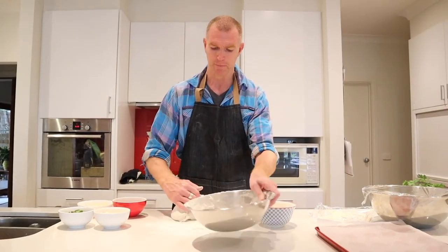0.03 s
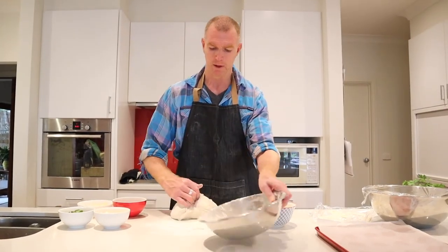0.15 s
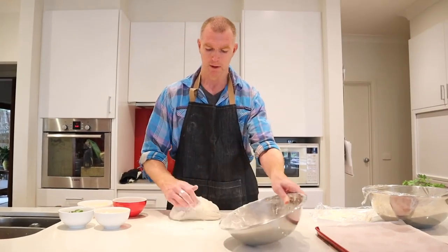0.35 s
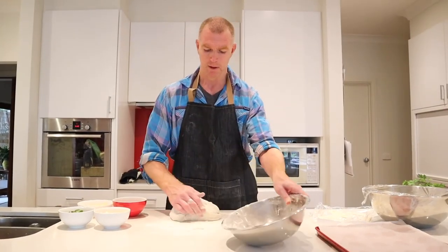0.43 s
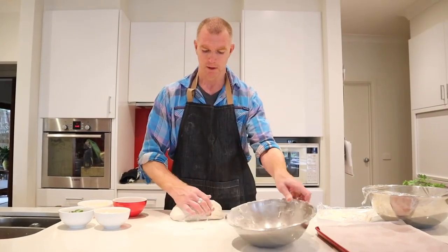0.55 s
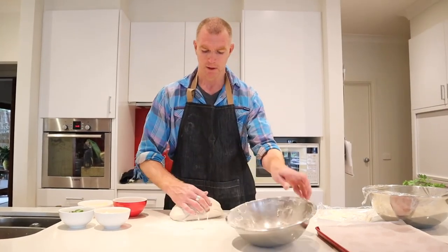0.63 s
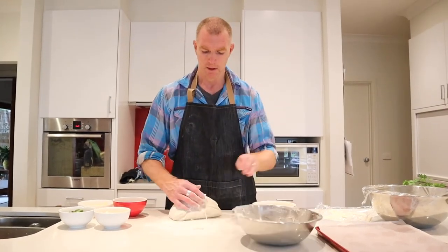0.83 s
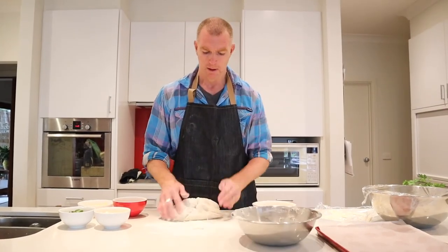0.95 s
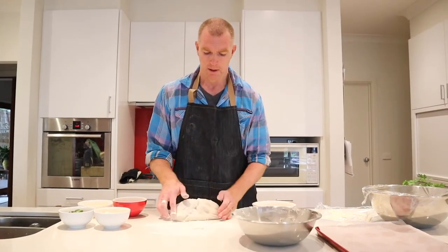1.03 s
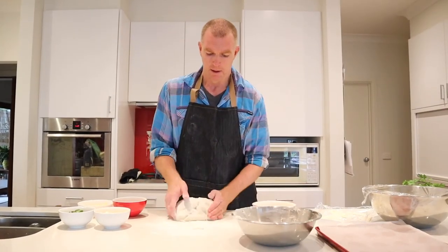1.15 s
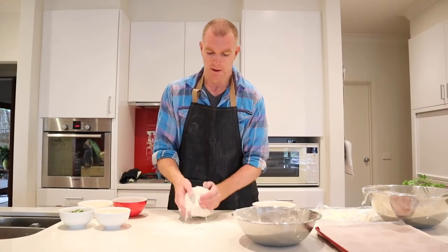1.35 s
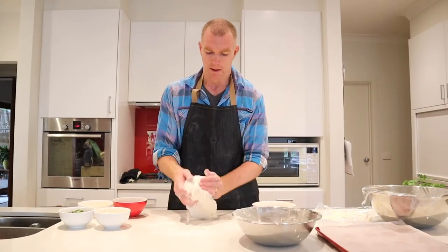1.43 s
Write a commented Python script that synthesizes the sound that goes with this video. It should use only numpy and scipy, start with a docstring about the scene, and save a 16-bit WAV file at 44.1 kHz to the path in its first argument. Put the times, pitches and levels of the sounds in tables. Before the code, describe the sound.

A steel mixing bowl knocks in quickening bursts on a hard kitchen benchtop and rocks flat

```python
"""A steel mixing bowl is set down on its edge on a hard benchtop, knocks ever quicker, then is let go and rocks flat.
Each knock rings the bowl's modes, thuds in the bench and clinks at the rim; the rolling rim rattles.
Faint ticks and a rustle of hands on dough are filtered clicks and noise; a hard-walled kitchen reverberates.
A fridge hums in wavering sines over shaped room noise; a limiter holds the knocks down.
"""
import sys
import numpy as np
from scipy import signal
from scipy.fft import rfft, irfft
from scipy.io import wavfile
from scipy.ndimage import uniform_filter1d

SR = 44100
rng = np.random.default_rng(int(sys.argv[2]) if len(sys.argv) > 2 else 0)


def to_wav(sig):
    """Store sig (one row per channel, or 1-D mono) as 16-bit WAV at the path in sys.argv[1].

    Samples outside -1..1 are clipped; the rate is SR.
    """
    pcm = np.clip(np.atleast_2d(sig), -1, 1) * 32767
    pcm = np.round(pcm).astype(np.int16)
    wavfile.write(sys.argv[1], SR, pcm.T)  # frames by channels


N = 66150

# Kitchen reverberation. Each row: frequency in Hz, t60 in s, level in dB, left-right likeness (1 = identical).
ROOM_BANDS = [(100, 0.2, -25.5, 0.95), (251, 0.52, -32.5, 0.96), (520, 0.54, -26.5, 0.19),
              (940, 0.54, -33.5, 0.49), (1880, 0.57, -32.5, 0.26), (4030, 0.48, -42, 0.14),
              (6800, 0.41, -38, 0.067), (9500, 0.09, -26, 0.34), (15300, 0.058, -37, .5)]

# bowl ring
RING_RISE_S, STRIKE_SPREAD_DB = 0.0014, 2
FAVOUR_DB, FAVOUR_OCTAVES = 7.5, 0.079  # the landing point on the rim favours modes near one pitch
GRIP_DB = 4.5  # ring lost to each later knock
DETUNE = .0008  # chance spread of mode pitch, as a fraction
RING_TO_ROOM_DB = -12
# bench and rim contacts
CONTACT_S, ROLL_PER_S, LOW_CUT_HZ = .0022, 4000, 83
TICK_T60_S = .003
# microphone ports: positive lag delays the left, positive pan lifts the left
TILTED_LAG_S, FREE_LAG_S = -0.000017, 2e-5
TILTED_PAN_DB, FREE_PAN_DB, PAN_FULL_HZ = 4, 1, 4130
# room and background
ROOM_ONSET_S = 0.00067
RUSTLE_LOW_HZ, RUSTLE_HIGH_HZ = 2000, 7440
HUM_WAVER_DB, FLOOR_DB = 2, -50.5
# limiter and output
LIMIT_DB, LIMIT_RATIO, RELEASE_DB_PER_S = -16.5, 2.135, 52.5
ATTACK_S, LOOK_AHEAD_S = 0.00057, 0.00099
TOP, CUTOFF_HZ = 0.42, 16300  # soft ceiling (full scale = 1), treble cutoff


def amp(db):
    """Decibels to amplitude."""
    return 10 ** (np.asarray(db) / 20)


def rms_one(x):
    """Scale to an rms of 1."""
    return x / np.sqrt(np.mean(x ** 2) + 1e-20)


def at_hz(rows, hz, order=1):
    """Read column `order` at hz, interpolated over log frequency."""
    rows = np.array(rows)
    return np.interp(np.log(hz), np.log(rows[:, 0]), rows[:, order])


def ring(clicks, hz, t60_s):
    """A two-pole resonance: a unit click sets a sine of height 1 ringing."""
    r = amp(-60 / (t60_s * SR))
    w = 2 * np.pi * hz / SR
    return signal.lfilter([0, np.sin(w)], [1, -2 * r * np.cos(w), r * r], clicks + 1e-18)


def thump(clicks, hz, t60_s):
    """A resonance applied twice: steep flanks, soft start, height near 1."""
    r = amp(-120 / (t60_s * SR))
    once = ring(clicks, hz, t60_s / 2)
    return 2 * np.e * (1 - r) * ring(once, hz, t60_s / 2)


def train(start_s, db):
    """One click per start time."""
    out = np.zeros(N)
    out[(np.asarray(start_s) * SR).astype(int)] = amp(db)
    return out


def low_cut(x):
    """A small bowl sends out no deep bass."""
    return signal.sosfilt(signal.butter(4, LOW_CUT_HZ, "high", fs=SR, output="sos"), x)


def bandpass(x, low_hz, high_hz):
    """Second-order Butterworth band."""
    return signal.sosfilt(signal.butter(2, [low_hz, high_hz], "band", fs=SR, output="sos"), x)


def drift(rate_hz):
    """Slow chance, rms 1: two-pole smoothed noise, drawn every 40 samples."""
    r = np.exp(-80 * np.pi * rate_hz / SR)
    white = rng.standard_normal(N // 40 + 2002)
    slow = signal.lfilter([1], [1, -2 * r, r * r], white)[2000:]
    return np.interp(np.arange(N) / 40, np.arange(len(slow)), rms_one(slow))


def bands():
    """Half-octave bands of stereo noise with the room's likeness: pairs (Hz, noise)."""
    edges_hz = 22 * 2 ** np.arange(0, 9.6, .5)
    white = rng.standard_normal((2, 2, N))
    for k, (low_hz, high_hz) in enumerate(zip(edges_hz, edges_hz[1:])):
        mid, side = bandpass(white[k % 2], low_hz, high_hz)
        hz = np.sqrt(low_hz * high_hz)
        alike = np.clip(at_hz(ROOM_BANDS, hz, order=3), -1, 1)
        yield hz, np.sqrt(1 + alike) * mid + np.sqrt(1 - alike) * side * [[1], [-1]]


def bowl_ring(knocks, free):
    """Every knock feeds all modes in step with their swing; later knocks take some of that ring away."""
    # One value per mode, in Hz.
    mode_hz = [262, 354, 499, 532, 741, 793, 994, 1313, 1472, 1614, 1911, 2379, 3176, 3580, 4620, 5335]
    # Each row, one mode: t60 in s, level in dB when tilted, level in dB when free.
    mode_rows = [(0.2, -16.5, -18), (0.028, -20, -17.5), (0.32, -34, -8.5), (0.21, -5, -7.5),
                 (0.2, -48, -4.5), (0.36, -26, -8), (0.14, -51, -6), (0.2, -10, -12), (0.29, -45, -12),
                 (0.31, -23.5, -9), (0.22, -28, -50), (0.12, -40, -14), (0.091, -32.5, -12.5),
                 (0.16, -37, -22.5), (0.084, -32, -38), (0.035, -26, -19)]
    hz = np.array(mode_hz)[:, None]
    t60_s, mode_db = np.array(mode_rows)[:, [0, 1 + free]].T[:, :, None]
    out = np.zeros(N + SR)
    t = np.arange(SR // 2) / SR
    starts_s = np.array(knocks)[:, 0]
    chance = rng.standard_normal((len(knocks), 2, len(mode_hz), 1))
    for (start_s, ring_db, tilt_db, favoured_hz, *_), (spread, shift) in zip(knocks, chance):
        favour = np.exp(-(np.log2(hz / favoured_hz) / FAVOUR_OCTAVES) ** 2)
        strike_db = mode_db + tilt_db * np.log2(hz / 700) + FAVOUR_DB * favour + STRIKE_SPREAD_DB * spread
        swing = np.sin(2 * np.pi * hz * (start_s + (1 + DETUNE * shift) * t))
        modes = amp(strike_db - 60 * t / t60_s) * swing
        later = np.searchsorted(starts_s[starts_s > start_s + .02], start_s + t) * 1.0
        later = uniform_filter1d(later, size=90)
        envelope = amp(ring_db - GRIP_DB * later) * (1 - np.exp(-t / RING_RISE_S))
        first = int(start_s * SR)
        out[first:first + len(t)] += envelope * modes.sum(0)
    return low_cut(out[:N])


def contacts(knocks, free):
    """Knocks thud in the bench and clink at the rim by brief rough contact; tiny contacts rattle as it rolls."""
    # Dull bench body. Each row: frequency in Hz, t60 in s, level in dB when tilted, level in dB when free.
    bench_modes = [(124.5, 0.044, -23, -27.5), (201.5, 0.025, 6, -9.5), (292, 0.033, 2.5, -12),
                   (458, 0.012, 6, -7), (648, 0.016, -9, -7), (807, 0.017, -0.5, -4.5),
                   (1164, 0.011, -21.5, -5.5), (1385, 0.034, -20.5, -10), (1593, 0.027, -28.5, -6)]
    # Bright rim resonances. Each row: frequency in Hz, t60 in s, level in dB when tilted, level in dB when free.
    rim_modes = [(1930, 0.0026, -6.5, 3), (2877, 0.013, -15.5, -4), (3820, 0.0015, -1.5, 4.5),
                 (4677, 0.0058, -0.5, -1.5), (5286, 0.013, -2, -6), (6120, 0.002, -1, 0),
                 (7820, 0.0032, -12.5, -5.5), (8790, 0.00089, -11.5, -5), (11600, 0.0019, -23.5, -11.5),
                 (13100, 0.0007, -32, -40)]
    # Rim rolling. Each row: start in s, end in s, level in dB, centre in Hz, half-width (to 1/e) in octaves.
    rolls = [(0.378, 0.544, -36.5, 4770, 0.8), (0.729, 0.845, -30.5, 5250, 0.41),
             (0.91, 1.028, -29.5, 4000, 1)]
    start_s, _, _, _, thud_db, thud_tilt_db, clink_db, clink_tilt_db = np.transpose(knocks)
    out = np.zeros(N)
    for k, mode in enumerate(bench_modes):
        hz, t60_s, mode_db = mode[0], mode[1], mode[2 + free]
        blows = train(start_s, thud_db + mode_db + thud_tilt_db * np.log2(hz / 700))
        out += thump(blows, hz, t60_s) * (-1) ** k
    fade = np.exp(-np.arange(400) / (CONTACT_S * SR))
    fade /= np.sqrt(np.sum(fade ** 2))
    rough = rng.standard_normal(N)
    rattle = (rng.random(N) < ROLL_PER_S / SR) * rough
    t = np.arange(N) / SR
    for k, mode in enumerate(rim_modes):
        hz, t60_s, mode_db = mode[0], mode[1], mode[2 + free]
        blows = train(start_s, clink_db + clink_tilt_db * np.log2(max(hz / 5500, 1)))
        contact = signal.fftconvolve(blows, fade)[:N] * np.sign(rough)
        rolling = np.zeros(N)
        for a_s, b_s, roll_db, centre_hz, octaves in rolls:
            if start_s[0] < a_s < start_s[-1]:
                weight = amp(roll_db) * np.exp(-(np.log2(hz / centre_hz) / octaves) ** 2)
                rolling += weight * np.clip((b_s - t) / (b_s - a_s), 0, 1) ** .5 * (t > a_s)
        out += amp(mode_db) * ring(contact + rattle * rolling, hz, t60_s) * (-1) ** k
    return low_cut(out)


def ports(x, lag_s, pan_db):
    """Two close microphone ports: a small lag and a level difference that grows towards the treble."""
    hz = np.fft.rfftfreq(N, 1 / SR)
    side = np.array([[1], [-1]])
    lag = np.exp(-1j * np.pi * hz * lag_s * side)
    pan = amp(pan_db / 2 * np.minimum(hz / PAN_FULL_HZ, 1) * side)
    return irfft(rfft(x) * lag * pan, N)


def finger_ticks():
    """Faint ticks of dough and fingers: clicked short resonances."""
    # Each row: start in s, level in dB, frequency in Hz.
    tick_rows = [(.056, -36.5, 9500), (0.0554, -76, 7050), (0.078, -58, 12000)]
    return sum(ring(train([start_s], db), hz, TICK_T60_S) for start_s, db, hz in tick_rows)


def kitchen(x):
    """Dense reflections, as noise that dies away band by band."""
    t = np.arange(N) / SR
    tail = np.zeros((2, N))
    for hz, noise in bands():
        decay_db = at_hz(ROOM_BANDS, hz, order=2) - 60 * t / at_hz(ROOM_BANDS, hz)
        tail += amp(decay_db) * noise
    onset = 1 - np.exp(-(t / ROOM_ONSET_S) ** 2)
    return signal.fftconvolve(x[None], tail * onset, axes=1)[:, :N]


def rustle():
    """Hands on dough: soft bright noise that swells and stops."""
    # Each row: time in s, level in dB.
    swell_rows = [(.2, -72), (1.1, -59), (1.202, -56), (1.381, -62.5), (1.438, -58), (1.47, -72)]
    time_s, db = np.transpose(swell_rows)
    mid, side = bandpass(rng.standard_normal((2, N)), RUSTLE_LOW_HZ, RUSTLE_HIGH_HZ)
    level_db = np.interp(np.arange(N) / SR, time_s, db) + 2.1 * drift(20.0)
    return amp(level_db) * rms_one(mid + 0.81 * side * np.array([[1], [-1]]))


def fridge():
    """Low sine tones that waver a little in level."""
    # Each row: frequency in Hz, rms level in dB.
    hum_tones = [(89.5, -47), (138, -59), (178, -60), (229, -59.5), (263, -64)]
    t = np.arange(N) / SR
    out = np.zeros(N)
    for hz, db in hum_tones:
        level = np.sqrt(2) * amp(db + HUM_WAVER_DB * drift(3.0))
        out += level * np.sin(2 * np.pi * (hz * t + rng.random()))
    return out


def room_tone():
    """Steady stereo noise, shaped band by band and set to one overall level."""
    # Each row: frequency in Hz, relative density in dB per Hz.
    floor_rows = [(15, -46), (25, -16), (59, -16), (96, -20), (113, -10.5), (289, -21.5), (410, -26.5),
                  (523, -29.5), (2500, -39), (9300, -55.5), (15500, -61)]
    shaped = sum(amp(at_hz(floor_rows, hz)) * noise for hz, noise in bands())
    return amp(FLOOR_DB) * rms_one(shaped)


def scene():
    """Bowl, ticks, room, rustle, fridge and room tone."""
    # Knocks, bowl tilted in the hand, then free and rocking flat. Each row: start in s, ring level in dB,
    # ring tilt in dB per octave, favoured pitch in Hz, bench thud in dB, thud tilt in dB per octave,
    # rim clink in dB, clink tilt in dB per octave.
    tilted_knocks = [(.2258, -9.5, -1.7, 532, -8.5, 1.7, -11.5, 14), (.2282, -39, 18, 1313, -27, 10, 1, 15),
                     (.250, -9.5, -1, 532, -38, -4, -30, 8), (.327, -13.5, 2.5, 1313, -9, 4, -3, 15),
                     (.384, -9, 1.5, 532, -13.5, 3, -4.5, 11), (.421, -26.5, 9, 354, -17, 3.5, -13, 13.5),
                     (.453, -21.5, 0.5, 1313, -35.5, 21, -21.5, 16.5),
                     (.4775, -17.5, -1.5, 532, -28, 17, -19, 10),
                     (.497, -30, 8.5, 1614, -34, -3.5, -18, -20),
                     (.512, -24.5, -4.5, 532, -32, -2.5, -35, 23),
                     (.526, -39.5, 3.5, 1614, -51, -11, -50, -8), (.55, -24.5, -0.5, 532, -54, 15, -44, -2)]
    free_knocks = [(.7175, -15, 1.5, 700, -5.5, -3.5, -10.5, 1), (.7215, -25.5, 0.5, 1280, -56, -2, -6, -1),
                   (.735, -20.5, -13.5, 535, -26.5, 1, -46, -1), (.779, -22.5, -5, 794, -12.5, -2, -43, -9),
                   (.822, -17, -5.5, 847, -41, -8, -32, 18.5), (.8596, -12, 1, 1480, -2, -3, 0.5, 6),
                   (.867, -18, -3, 734, -16.5, 9, -46, -1), (.907, -10.5, 1.5, 1614, -0.5, 0, 0, 8),
                   (.931, -23.5, 4.5, 3176, -49, -6, -43, -11), (.943, -12.5, -11, 501, -19, 13.5, -14, -9),
                   (.9604, -17.5, 2, 5370, -44, -3, -11, -3), (.982, -20, 4, 1614, -38, -12.5, -17.5, 4),
                   (1.0033, -16.5, -3.5, 262, -12, -5, -12, -16),
                   (1.022, -19.5, -1.5, 494, -21.5, 5.5, -53, -19),
                   (1.065, -26.5, 0.5, 1614, -55, -8.5, -53, 12)]
    tilted_ring, free_ring = bowl_ring(tilted_knocks, free=0), bowl_ring(free_knocks, free=1)
    tilted_hits, free_hits = contacts(tilted_knocks, free=0), contacts(free_knocks, free=1)
    ticks = finger_ticks()
    direct = ports(tilted_ring + tilted_hits + ticks, TILTED_LAG_S, TILTED_PAN_DB)
    direct = direct + ports(free_ring + free_hits, FREE_LAG_S, FREE_PAN_DB)
    to_room = amp(RING_TO_ROOM_DB) * (tilted_ring + free_ring) + tilted_hits + free_hits + ticks
    return direct + kitchen(to_room) + rustle() + fridge() + room_tone()


def record(dry):
    """The stereo difference is reshaped, a limiter and a soft ceiling hold the peaks, the top is cut."""
    # Gain of the left-right difference. Each row: frequency in Hz, gain in dB.
    widen_rows = [(300, -8), (1500, 2), (4000, 5), (8000, 8), (15000, 9)]
    hz = np.fft.rfftfreq(N, 1 / SR) + 1
    side = irfft(rfft(dry[0] - dry[1]) * amp(at_hz(widen_rows, hz)), N)
    wide = (dry.sum(0) + side * [[1], [-1]]) / 2
    # peak level of the louder channel, falling at a steady dB rate
    fall_db = RELEASE_DB_PER_S * np.arange(N) / SR
    peak_db = 20 * np.log10(np.abs(wide).max(0) + 1e-9)
    level_db = np.maximum.accumulate(peak_db + fall_db) - fall_db
    over_db = np.maximum(level_db - LIMIT_DB, 0)
    r = np.exp(-1 / (ATTACK_S * SR))
    cut_db = signal.lfilter([1 - r], [1, -r], over_db * (1 - 1 / LIMIT_RATIO))
    cut_db = np.interp(np.arange(N) + LOOK_AHEAD_S * SR, np.arange(N), cut_db)
    limited = TOP * np.tanh(wide * amp(-cut_db) / TOP)
    return signal.sosfilt(signal.cheby2(12, 70, CUTOFF_HZ, fs=SR, output="sos"), limited)


dry = scene()
out = record(dry)
to_wav(out)
```